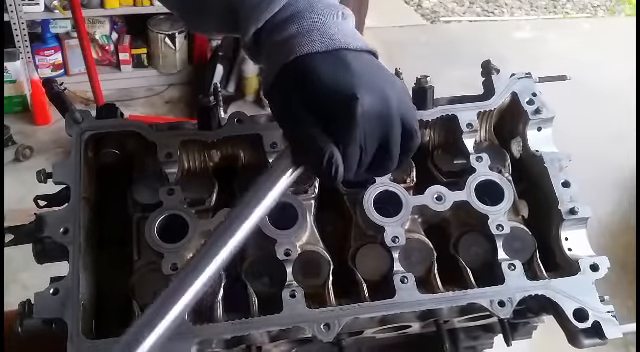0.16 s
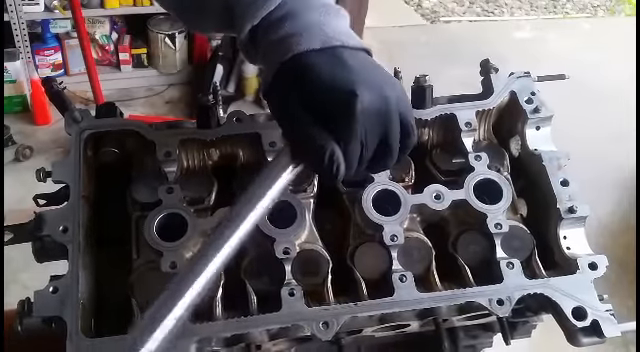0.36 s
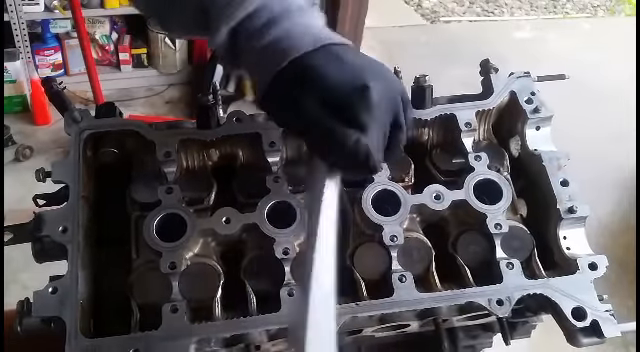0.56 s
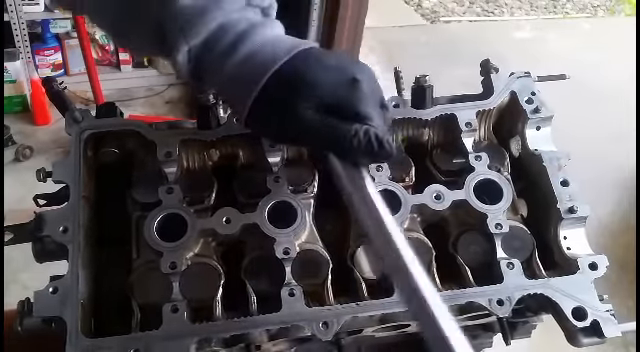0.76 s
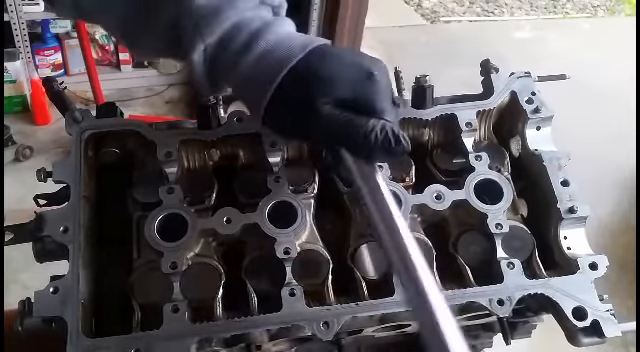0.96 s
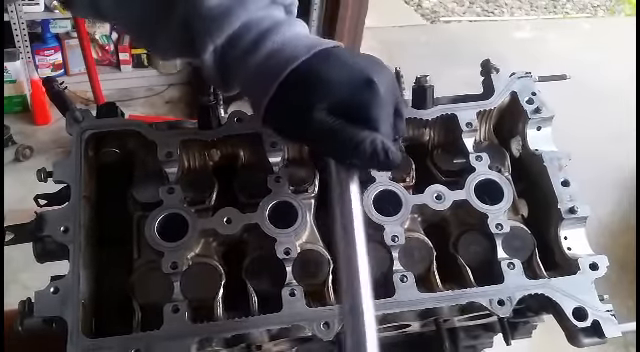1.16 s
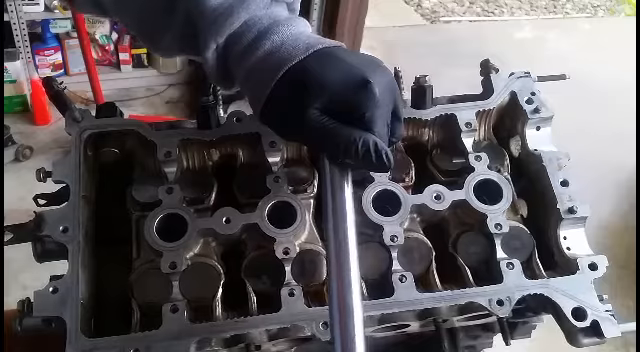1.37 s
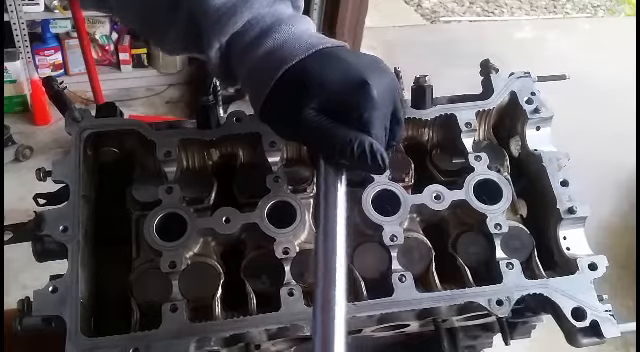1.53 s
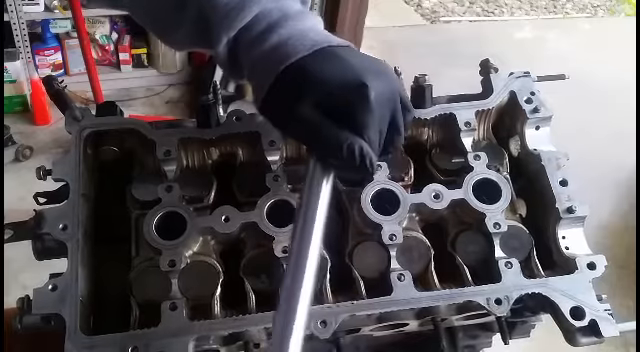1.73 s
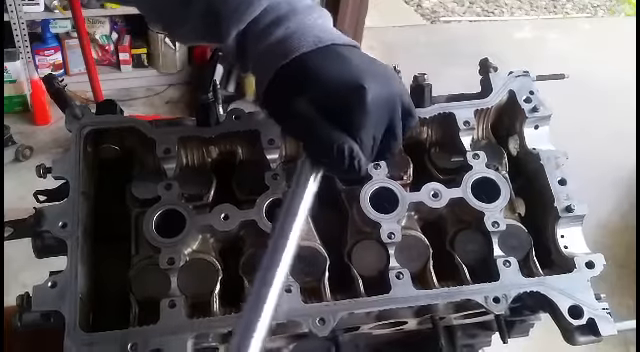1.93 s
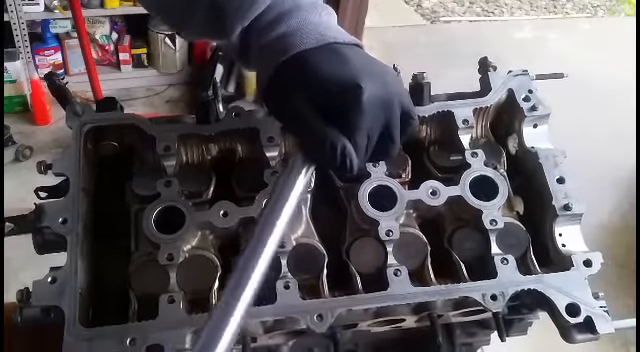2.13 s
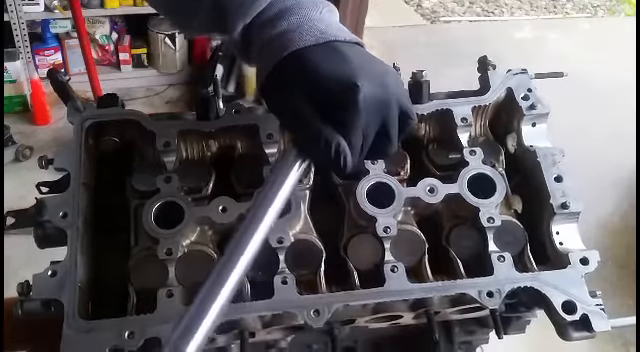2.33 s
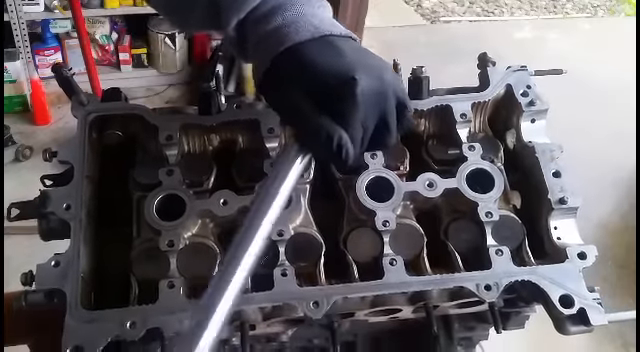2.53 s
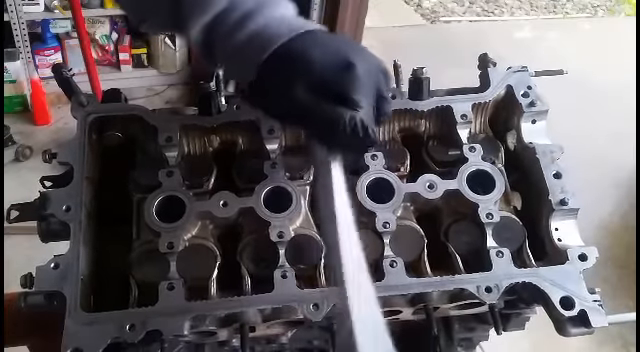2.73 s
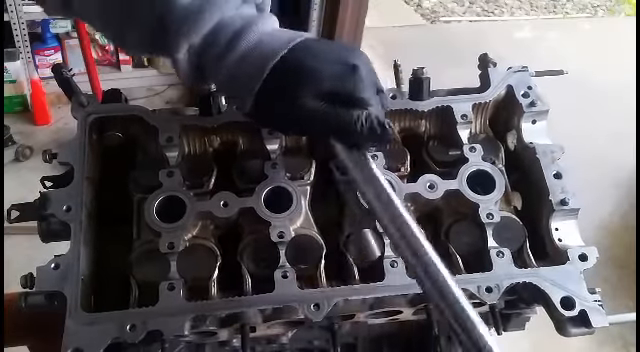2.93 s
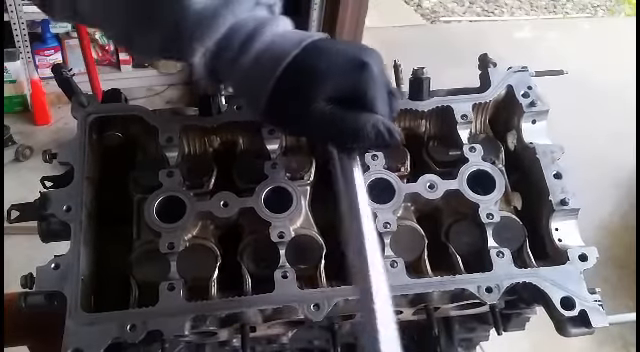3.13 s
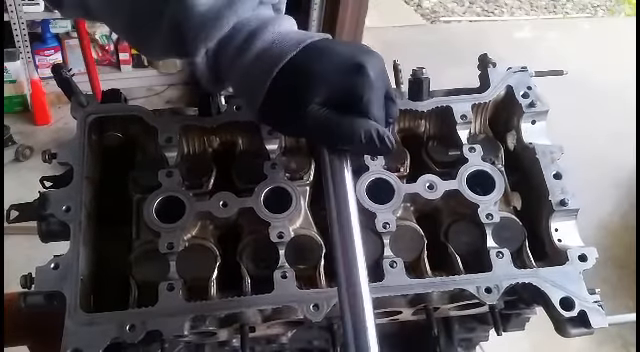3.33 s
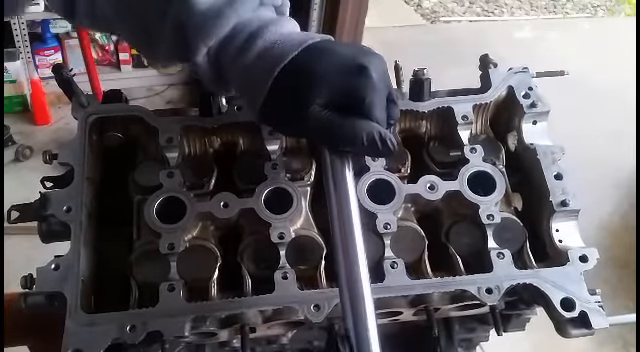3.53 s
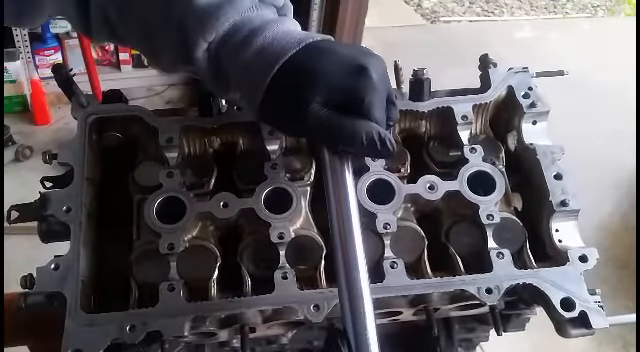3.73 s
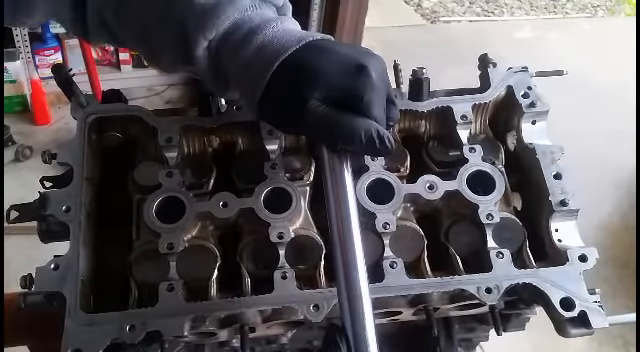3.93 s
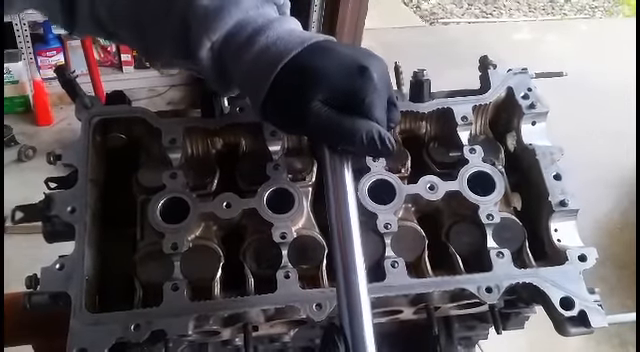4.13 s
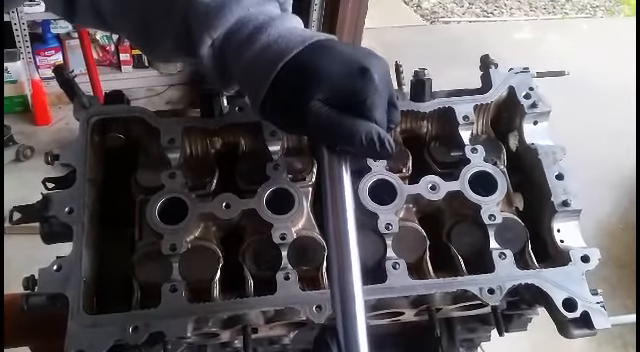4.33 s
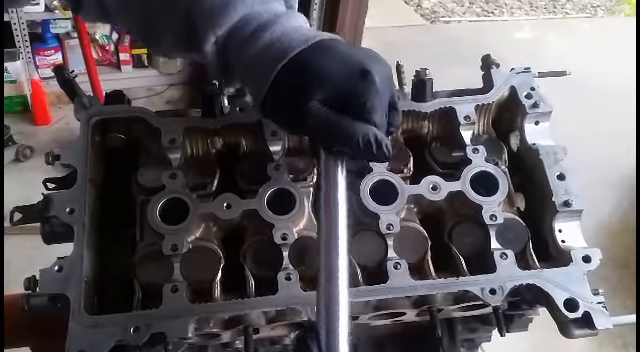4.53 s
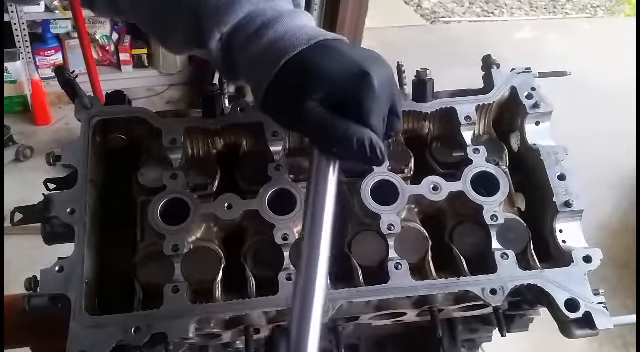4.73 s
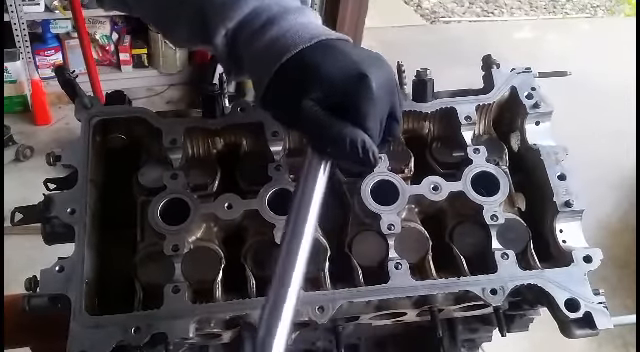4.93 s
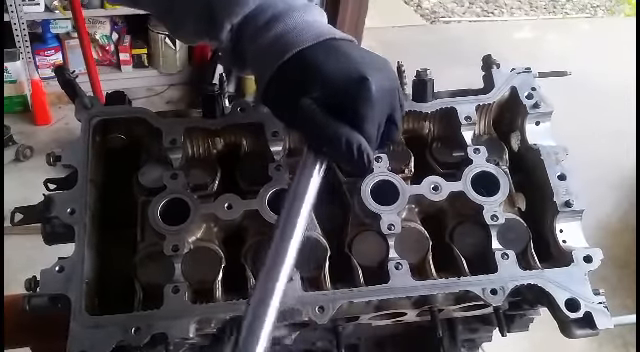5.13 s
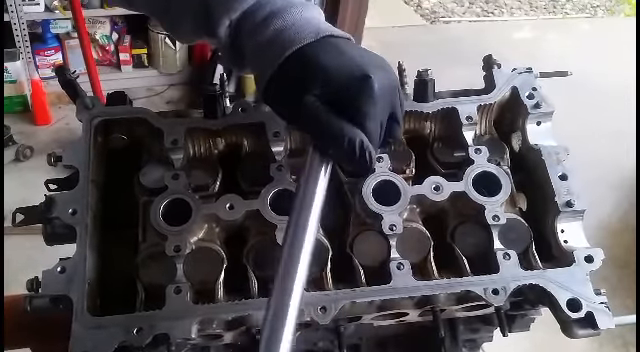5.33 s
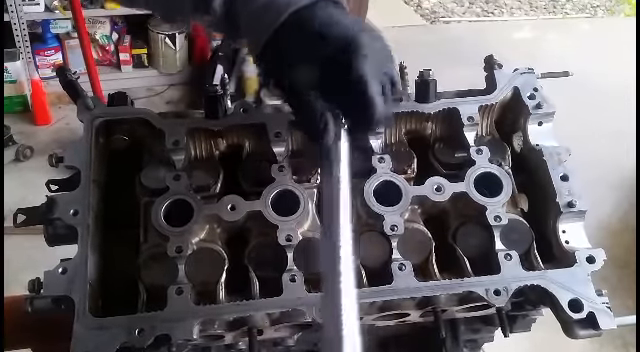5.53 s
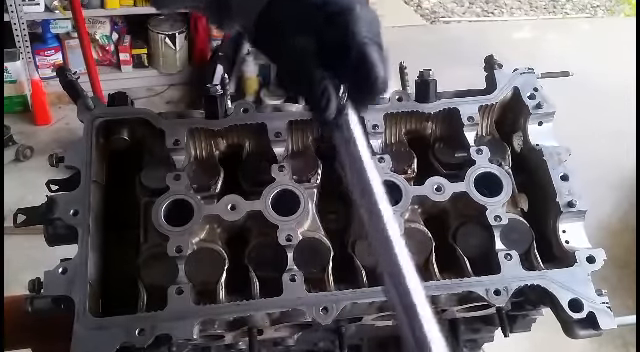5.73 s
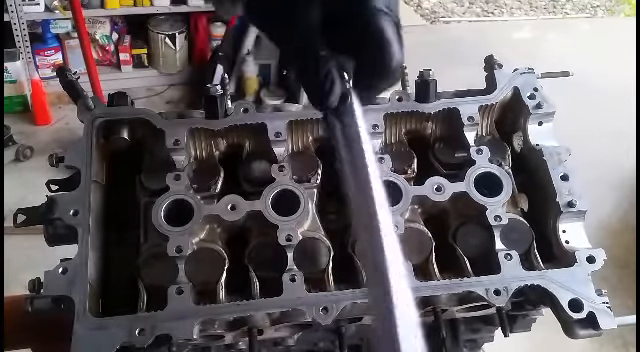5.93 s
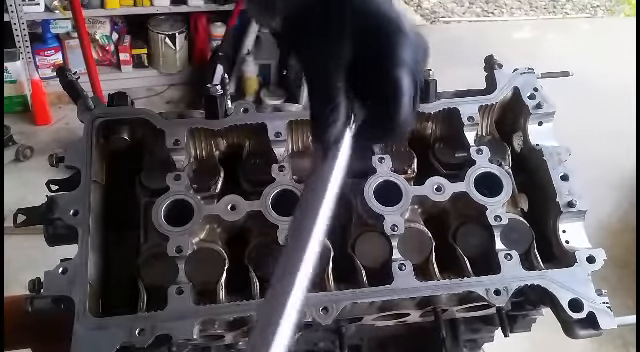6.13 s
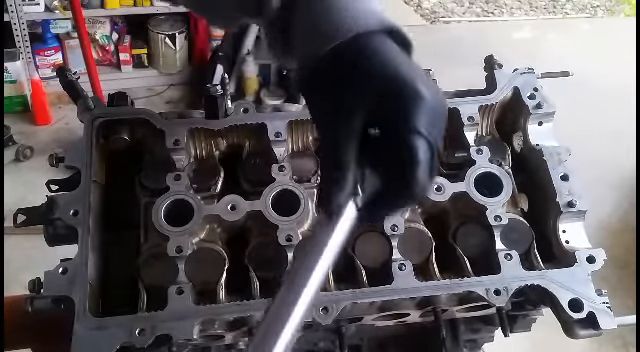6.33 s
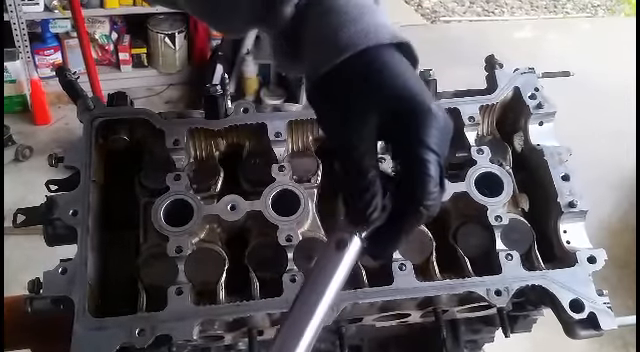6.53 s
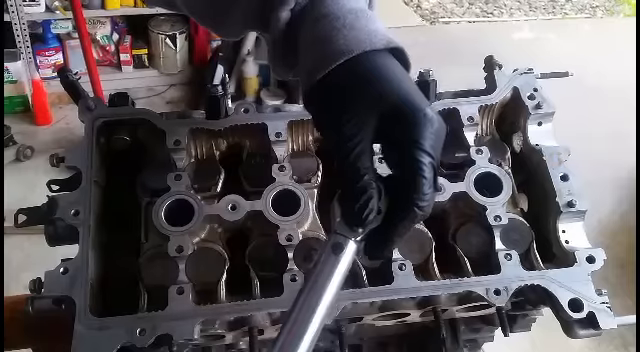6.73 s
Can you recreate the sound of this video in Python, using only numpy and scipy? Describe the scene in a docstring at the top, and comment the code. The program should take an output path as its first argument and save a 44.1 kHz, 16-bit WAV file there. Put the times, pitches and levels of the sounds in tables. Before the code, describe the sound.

Close up in an open garage, a steel wrench gives a fast run of bright ratchet ticks, a soft knock, then a second run. Dull knocks and fabric swishes follow. Later a sharp clutch click snaps, springs back, and the socket comes off with a clack. Low rumble, road roar and an unsteady far engine drone lie underneath.

```python
"""Rumble, road roar and hum in an open garage, then wrench ticks, snaps and knocks up close.
Background is shaped noise plus a wavering engine drone and mains hum; a faint whistle slides down.
A gloved hand swings a click-type wrench on an engine head: fabric noise swishes, and swarms of tiny
contacts excite steel modes as the pawl ticks, the clutch snaps and the socket and handle knock.
A garage echo follows the wrench, and two microphone ports colour the stereo sound."""
import sys
import numpy as np
from scipy import signal
from scipy.fft import rfft, irfft
from scipy.io import wavfile
from scipy.ndimage import uniform_filter1d

SR = 44100
rng = np.random.default_rng(int(sys.argv[2]) if len(sys.argv) > 2 else 0)


def to_wav(sig):
    """Store sig (one row per channel, or 1-D mono) as 16-bit WAV at the path in sys.argv[1].

    Samples outside -1..1 are clipped; the rate is SR.
    """
    pcm = np.clip(np.atleast_2d(sig), -1, 1) * 32767
    pcm = np.round(pcm).astype(np.int16)
    wavfile.write(sys.argv[1], SR, pcm.T)  # frames by channels


N = 303849
T = np.arange(N) / SR  # seconds


def undb(db):
    """Turn decibels into amplitude gain."""
    return 10 ** (np.asarray(db) / 20)


def unit(x):
    """Scale to an rms of 1."""
    return x / np.sqrt(np.mean(x ** 2))


def shape(table, hz):
    """Read frequency/value rows on a log-frequency axis."""
    row_hz, value = np.transpose(table)
    return np.interp(np.log(np.maximum(hz, 1)), np.log(row_hz), value)


def colour(x, table):
    """Filter causally, with minimum phase, to the gain of a frequency/level table."""
    size = 4096
    log_gain = np.log(undb(shape(table, np.fft.rfftfreq(size, 1 / SR))))
    cepstrum = irfft(log_gain, size)
    # Folding the cepstrum forward puts the response after the blow
    cepstrum[1:size // 2] *= 2
    cepstrum[size // 2 + 1:] = 0
    response = irfft(np.exp(rfft(cepstrum)), size)[None, :size // 2]
    return signal.fftconvolve(x, response, axes=-1)[:, :N]


def walk(rate):
    """Smoothed random drift of rms 1, drawing rate new values per second."""
    hold = int(SR / rate)
    steps = np.repeat(rng.standard_normal(N // hold + 1), hold)
    return unit(uniform_filter1d(uniform_filter1d(steps, hold), hold)[:N])


# Likeness of the diffuse sound at the two ports: pitch_hz [Hz], likeness [0-1]
LIKENESS = [(30, 1), (150, .95), (300, 0.46), (600, 0.5), (4000, 0), (16000, .5)]
LEFT_LAG_S = .00025


def diffuse(table):
    """Coloured noise at two ports: partly alike, the shared part a little late on the left."""
    hz = np.fft.rfftfreq(N, 1 / SR)
    like = np.clip(shape(LIKENESS, hz), 0, 1)
    right, other = rfft(rng.standard_normal((2, N))) * undb(shape(table, hz))
    shared = like * right * np.exp(-2j * np.pi * hz * LEFT_LAG_S)
    left = shared + np.sqrt(1 - like ** 2) * other
    return unit(irfft(np.array([left, right]), N))


# Background level over time, rumble and roar growing louder and softer, often louder after the clicks:
# time_s [s], roar_db [dB, drives FOLLOW], rumble_db [dB]
AIR = [(0, -67.5, -56.5), (.44, -66, -54), (.63, -64, -54.5), (.82, -58.5, -47), (1.1, -60, -53.5),
       (1.5, -64, -52.5), (1.9, -65.5, -55), (2.13, -67, -58.5), (2.45, -68.5, -56.5), (2.8, -62, -50),
       (3.1, -59, -50.5), (3.45, -58.5, -50.5), (3.9, -60.5, -51), (4.32, -63, -50.5), (4.64, -65, -54),
       (4.9, -63.5, -52), (5.16, -67.5, -56), (5.4, -73, -61.5), (5.7, -75, -62.5), (6.05, -76, -62),
       (6.4, -66.5, -57), (6.6, -65.5, -55), (6.8, -59.5, -47.5), (6.89, -61, -49.5)]
# How roar, hiss and top hiss follow the roar curve, one row each:
# level_db [dB at the usual roar], gain_per_db [dB per dB of roar]
FOLLOW = [(-65.5, 1), (-71.5, 1.08), (-81, 0.82)]
USUAL_DB = -65
# Relative spectrum of the low rumble: pitch_hz [Hz], density_db [dB per Hz]
RUMBLE = [(12, -48), (20, -18.5), (22, -23), (30, -17.5), (42, -5.5), (70, 0), (114, -4), (130, -4.5),
          (187, -9.5), (226, -15), (329, -27), (500, -27.5), (650, -56), (1100, -120)]
# Relative spectrum of the road roar: pitch_hz [Hz], density_db [dB per Hz]
ROAD = [(150, -32), (250, -8), (419, -11.5), (468, -14), (808, -7), (1450, -11), (2360, -25.5), (2800, -22),
        (3640, -51.5), (6160, -120)]
# Relative spectrum of the hiss: pitch_hz [Hz], density_db [dB per Hz]
HISS = [(1470, -44), (2500, -14.5), (3270, -9), (3700, -2.5), (4320, 1), (4810, -3.5), (5960, -27),
        (9000, -36), (11700, -62), (19800, -120)]
# Relative spectrum of the top hiss, shared by the fabric swishes: pitch_hz [Hz], density_db [dB per Hz]
RUSTLE = [(4710, -56), (8000, -23), (8700, -31), (10300, -4.5), (12300, 1.5), (15400, -10), (16000, -17),
          (16200, -36), (16400, -53.5)]


def outdoors():
    """Noise bands: rumble and roar grow louder and softer, two hisses follow the roar; all flicker."""
    time_s, *columns = np.transpose(AIR)
    roar_db, rumble_db = (np.interp(T, time_s, column) for column in columns)
    levels = [rumble_db] + [db + per_db * (roar_db - USUAL_DB) for db, per_db in FOLLOW]
    bed = np.zeros((2, N))
    for level_db, spectrum in zip(levels, (RUMBLE, ROAD, HISS, RUSTLE)):
        bed += undb(level_db + 0.71 * walk(12)) * diffuse(spectrum)
    return bed


# Far engine and mains hum, before their wavering: time_s [s], drone_hz [Hz], drone_db [dB], hum_db [dB]
DRONE = [(0, 93.7, -73, -65.5), (.6, 94.3, -65, -59), (1.2, 94, -64.5, -57.5), (2, 94, -78, -64),
         (2.6, 93.76, -60.5, -57.5), (3.1, 92.4, -47, -62.5), (3.6, 93.5, -47.5, -63.5),
         (4.2, 94.9, -48.5, -63.5), (4.6, 93.53, -56, -58.5), (5.1, 96, -58, -70), (5.6, 93.7, -74.5, -71),
         (6.1, 97, -57.5, -69.5), (6.89, 93.6, -62.5, -61)]
HUM_HZ = 120


def wavering_tone(hz, level_db):
    """Sine whose phase accumulates a changing pitch."""
    return undb(level_db) * np.sin(2 * np.pi * np.cumsum(hz) / SR)


def tones():
    """An engine far off drones as an unsteady sine; mains hum wavers beside it."""
    time_s, *columns = np.transpose(DRONE)
    drone_hz, drone_db, hum_db = (np.interp(T, time_s, column) for column in columns)
    drone = wavering_tone(drone_hz + 1.5 * walk(12), drone_db + 1.1 * walk(14))
    hum = wavering_tone(HUM_HZ + 1.5 * walk(10), hum_db + 1.9 * walk(11))
    return np.sqrt(2) * (drone + hum)  # levels are rms


# Faint whistle sliding down: time_s [s], pitch_hz [Hz], level_db [dB]
WHISTLE = [(2.1, 2157, -100), (2.27, 2150, -86.5), (2.4, 2080, -88), (2.55, 2050, -77), (2.75, 2060, -79),
           (3.0, 2000, -83.5), (3.3, 1990, -100)]


def whistle():
    """Slow noise modulates a drifting sine into a narrow noise band."""
    time_s, *columns = np.transpose(WHISTLE)
    hz, level_db = (np.interp(T, time_s, column) for column in columns)
    return walk(150) * wavering_tone(hz, level_db)


# Glove and sleeve brushing: start_s [s], level_db [dB before grain], swell_s [s], fade_s [s, time constant]
BRUSH = [(.6, -66.5, 0.1, .05), (.95, -67.5, 0.16, 0.16), (1.797, -65, .006, 0.042), (2.7, -67, 0.15, .08),
         (3.0, -61.5, 0.16, 0.17), (3.44, -61, .024, 0.13), (5.99, -72.5, 0.013, .06),
         (6.47, -80, .06, .06)]


def brushes():
    """Fabric slides in soft swishes; random level drift makes the noise grainy."""
    swish = np.zeros(N)
    for start_s, level_db, swell_s, fade_s in BRUSH:
        t = np.maximum(T - start_s, 0)
        fade = np.exp(-np.maximum(t - swell_s, 0) / fade_s)
        swish += undb(level_db) * np.minimum(t / swell_s, 1) * fade
    grain = undb(2.5 * walk(40) + 1.5 * walk(300))
    return swish * grain * diffuse(RUSTLE)


def garage(x, near_t60, far_t60, far_db):
    """Echo of decaying noise: quick scatter off the engine and bench, then the slower walls."""
    t = T[:SR // 2]
    near = 1000. ** (-t / near_t60)
    far = undb(far_db) * 1000. ** (-t / far_t60)
    echo = rng.standard_normal((2, len(t))) * (near + far) * np.minimum(t / 0.0067, 1)
    return signal.fftconvolve(x, echo / np.sqrt(np.sum(echo ** 2) / 2), axes=-1)[:, :N]


def ring(modes, scatter_db, detune):
    """Decaying sine modes after one blow; each port meets them at another strength and sign."""
    hz, level_db, t60_s = np.transpose(modes)[:, :, None]
    t = T[:int(SR * t60_s.max()) + 1]
    size, sign, shift = rng.standard_normal((3, 2, len(modes), 1))
    # Both ports share one detuning per mode
    waves = np.sin(2 * np.pi * hz * (1 + detune * shift[0]) * t) * 1000. ** (-t / t60_s)
    return np.sum(np.sign(sign) * undb(level_db + scatter_db * size) * waves, axis=1)


def strike(blow, modes, scatter_db, detune):
    """A blow rings a set of modes by convolution."""
    return signal.fftconvolve(blow, ring(modes, scatter_db, detune), axes=-1)


def chatter(ms, rise_ms, scatter_db):
    """A part lands in a swarm of tiny contacts that swells fast and dies away."""
    length = int(SR * (ms + rise_ms) / 100) + 400  # about ten time constants
    sign, size = rng.standard_normal((2, 2, SR // 2))[..., :length]
    t = 1000 * T[:sign.shape[1]]  # milliseconds
    swell = (1 - np.exp(-t / rise_ms)) ** 2
    return sign * undb(scatter_db * size) * swell * np.exp(-t / max(ms, .2))


def add(out, s, x, db):
    """Mix x into out at time s, its loudest short stretch set to db."""
    i = int(s * SR)
    x = x[:, :N - i]
    power = uniform_filter1d(np.mean(x ** 2, axis=0), size=60)
    out[:, i:i + x.shape[1]] += x * undb(db) / np.sqrt(2 * power.max())


# Broad steel crack, the treble of clicks and rattles: pitch_hz [Hz], gain_db [dB]
CRACK = [(2000, -43), (5600, -17), (7200, -37), (8800, -33.5), (10000, -1), (12300, -6), (15000, -12),
         (15800, -22.5), (16800, -48)]
# Duller clack, the body of clicks and rattles: pitch_hz [Hz], gain_db [dB]
CLACK = [(150, -34), (400, -11), (1000, 4), (2000, 1), (4300, 2.5), (5500, -25), (7000, -28.5),
         (12000, -56.5)]
# Handle tube modes: pitch_hz [Hz], level_db [dB], t60_s [s]
HANDLE = [(1465, 0, .2), (3340, -5, .15), (3880, -3, .2), (4275, -1, .15), (4870, -3, .4)]
# Loose parts rattling on after each sharp snap or the socket coming off:
# start_s [s], treble_db [dB], body_db [dB], t60_s [s], handle_ring_db [dB]
RATTLE = [(5.078, -35.5, -40, 0.34, -41), (5.358, -49, -47.5, .31, -69), (6.67, -44.5, -44, 0.32, -69)]


def rattles():
    """Dense rough clatter dies away, with the thin modal ring of the handle tube."""
    out = np.zeros((2, N))
    for start_s, treble_db, body_db, t60_s, ring_db in RATTLE:
        clatter = chatter(1000 * t60_s / np.log(1000), rise_ms=2.0, scatter_db=4)
        add(out, start_s, colour(clatter, CRACK), treble_db)
        add(out, start_s, colour(clatter, CLACK), body_db)
        add(out, start_s, ring(HANDLE, scatter_db=2, detune=.002), ring_db)
    return out


# Handle, socket and casting modes, shared by knocks and clicks: pitch_hz [Hz], level_db [dB], t60_s [s]
BODY = [(810, -9.5, .03), (1004, -2, .03), (1186, -4, 0.015), (1470, -4, .03), (1823, 2.5, .025),
        (1940, 2, .02), (3380, -3.5, .02), (3870, -6.5, 0.027), (4500, -12, 0.018), (5444, -7.5, .015)]
# Engine stand modes: pitch_hz [Hz], level_db [dB], t60_s [s]
THUD = [(215, -8, .06), (288, 0, .1)]
# Socket and handle knocks, and the dull thuds under the clutch snaps: start_s [s], level_db [dB],
# pitch_hz [Hz], clatter_t60_s [s], ring_db [dB re level], thud_db [dB re level]
KNOCK = [(.574, -48.5, 1187, 0.11, 8.5, -11), (0.653, -49.5, 980, 0.13, -3.5, -6),
         (1.192, -40, 1340, 0.079, 1, -11), (2.733, -33.5, 1140, 0.094, -.5, -7.5),
         (3.226, -46, 1540, 0.1, -6, 0.3), (3.54, -50, 1670, 0.88, -6, -4),
         (4.035, -39.5, 375.3, 0.32, 1.5, -13), (5.078, -46.5, 520, 0.28, -9.5, -22),
         (5.358, -42, 566, 0.12, -10, -18), (6.669, -39.5, 995, 0.14, 1.5, -12)]


def knocks():
    """A softer push: dull clatter around one pitch, the body modes near it and a thud in the stand."""
    out = np.zeros((2, N))
    for start_s, level_db, hz, t60_s, ring_db, thud_db in KNOCK:
        clatter = chatter(1000 * t60_s / np.log(1000), rise_ms=0.17, scatter_db=1)
        dull = [(hz / 6, -30), (hz / 2.5, -5), (hz, 0), (hz * 1.5, -6), (hz * 5, -40), (hz * 12, -80)]
        add(out, start_s, colour(clatter, dull), level_db)
        push = np.abs(chatter(.15, rise_ms=.1, scatter_db=1))  # all contacts press the same way
        nearby = [(f, db - 9 * np.log2(f / hz) ** 2, t60) for f, db, t60 in BODY]
        modes = [(hz, 4, .4 * t60_s)] + nearby
        add(out, start_s, strike(push, modes, scatter_db=-1.5, detune=.01), level_db + ring_db)
        thud = strike(push, THUD, scatter_db=2.5, detune=.01)[[0, 0]]  # same at both ports
        add(out, start_s, thud, level_db + thud_db)
    return out


# Small steel parts of the head: pitch_hz [Hz], level_db [dB], t60_s [s]
HEAD = [(9800, -15, .02), (10600, -18, .01), (11300, -14, .01), (12000, -8, .01), (12250, 0, .012),
        (12600, -6, .012), (14100, -18, .01), (15000, -17, .01)]


def clicks(table, rise_ms, ring_db, crack_db, body_ring_db, pan_db, body_pan_db, linger):
    """Steel on steel: chatter rings the head and cracks broadly; the body rattles a little longer."""
    out = np.zeros((2, N))
    side, body_side = (undb(np.array([[pan], [-pan]]) / 2) for pan in (pan_db, body_pan_db))
    for start_s, level_db, body_re_treble_db, chatter_ms in table:
        body_db = level_db + body_re_treble_db
        blow = chatter(chatter_ms, rise_ms, scatter_db=3)
        shake = chatter(linger * chatter_ms, rise_ms, scatter_db=3)
        head_ring = strike(blow, HEAD, scatter_db=1, detune=0.0063)
        add(out, start_s, side * head_ring, level_db + ring_db)
        add(out, start_s, side * colour(blow, CRACK), level_db + crack_db)
        add(out, start_s, body_side * colour(shake, CLACK), body_db)
        body_ring = strike(shake, BODY, scatter_db=-1.0, detune=0.03)
        add(out, start_s, body_side * body_ring, body_db + body_ring_db)
    return out


# Faint ticks of slack in the drive:
# start_s [s], level_db [dB], body_re_treble_db [dB], chatter_ms [ms, time constant]
SLACK = [(1.192, -50.5, -14, 3), (1.2452, -45.5, -16.5, 1.8), (1.7997, -53.5, -11, 3),
         (3.231, -46, -7.5, 3.66), (5.711, -69, -7, 2.7), (5.826, -60, -3, 3.4), (5.8347, -60, -4.5, 4.1)]


def slack_ticks():
    """Slack in the drive ticks with faint steel contacts."""
    return clicks(SLACK, rise_ms=0.48, ring_db=-5.5, crack_db=-1.3, body_ring_db=4.5,
                  pan_db=1.0, body_pan_db=-5.5, linger=2.6)


# Clutch snapping over, springing back, socket pulled off:
# start_s [s], level_db [dB], body_re_treble_db [dB], chatter_ms [ms, time constant]
SNAP = [(5.0771, -21.5, -17, 1.9), (5.0818, -23, -17, 0.44), (5.3568, -25, -12, 5.3),
        (6.6685, -28, -5, 2.7)]


def clutch_snaps():
    """The clutch snaps at torque and springs back, then the socket comes off: sharp steel contacts."""
    return clicks(SNAP, rise_ms=0.34, ring_db=0.1, crack_db=-3.5, body_ring_db=2.5,
                  pan_db=-4.5, body_pan_db=-6, linger=1.64)


# Pawl dropping over a tooth, some with a first light touch:
# start_s [s], level_db [dB], body_re_treble_db [dB], chatter_ms [ms, time constant]
PAWL = [(.6915, -36, -22, 2.5), (.6955, -25.5, -20.5, 3.2), (.7415, -23.5, -20, 2.4),
        (.7748, -14, -26, 1.5), (.8094, -14.5, -25.5, 2.4), (.86, -26, -14.5, 4), (.8645, -19.5, -29, 3.4),
        (2.8368, -25, -17, 2.4), (2.868, -31.5, -24.5, 2), (2.8705, -20.5, -19.5, 2),
        (2.9122, -18, -22, 3.8), (2.967, -26, -19, 1.7), (2.9725, -19, -21, 3.9)]


def pawl_ticks():
    """On the back swing the ratchet pawl drops over teeth, ringing the head and shaking the body."""
    return clicks(PAWL, rise_ms=0.72, ring_db=1.1, crack_db=-6.0, body_ring_db=-1,
                  pan_db=-3.0, body_pan_db=-4, linger=5.1)


# Path from wrench to ports: pitch_hz [Hz], gain_db [dB]
REACH = [(4800, -2.5), (6000, -3), (7200, -5.5), (8600, -2), (9600, -5.5), (15300, -3), (16000, -13.5),
         (16800, -23)]


def scene():
    """Layer the wrench and its echo over fabric, outdoor noise, tones and whistle."""
    wrench = colour(pawl_ticks() + slack_ticks() + clutch_snaps() + knocks() + rattles(), REACH)
    echo = undb(-8) * garage(wrench, near_t60=0.093, far_t60=0.71, far_db=-23.0)
    return wrench + echo + brushes() + outdoors() + tones() + whistle()


# Colour difference of the ports: pitch_hz [Hz], left_minus_right_db [dB]
PORTS = [(60, -1), (110, 2), (200, 4.5), (380, 3), (700, 8.5), (1290, 10.5), (2380, 7), (4400, 10),
         (8120, 5.5), (15000, 1.5)]
TOP_HZ = 16400


def record(dry):
    """The two ports differ in colour; a steep low-pass cuts the top."""
    left = colour(dry[:1], [(hz, db / 2) for hz, db in PORTS])
    right = colour(dry[1:], [(hz, -db / 2) for hz, db in PORTS])
    low_pass = signal.ellip(8, .2, 70, TOP_HZ, fs=SR, output="sos")
    return signal.sosfilt(low_pass, np.vstack([left, right]))


dry = scene()
out = record(dry)
to_wav(out)
```